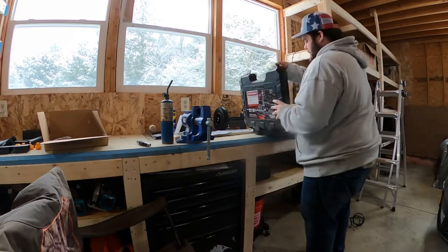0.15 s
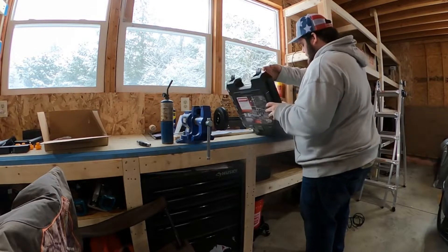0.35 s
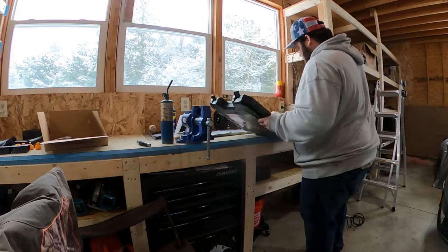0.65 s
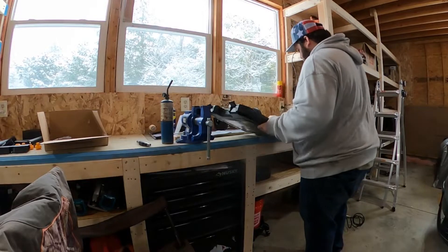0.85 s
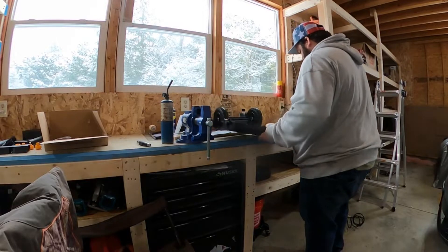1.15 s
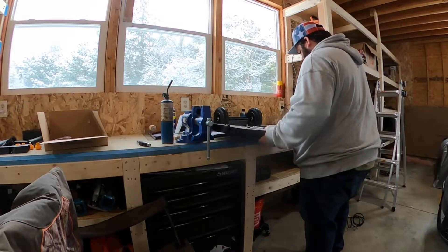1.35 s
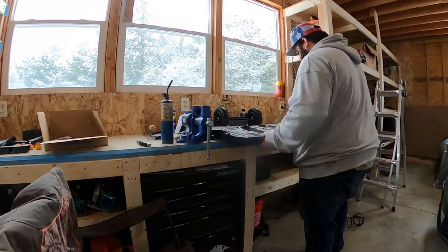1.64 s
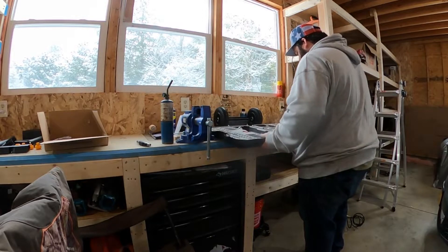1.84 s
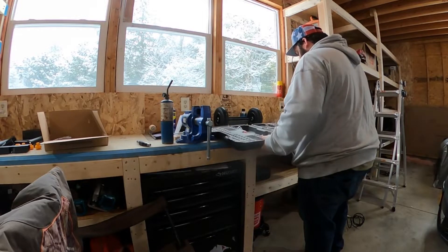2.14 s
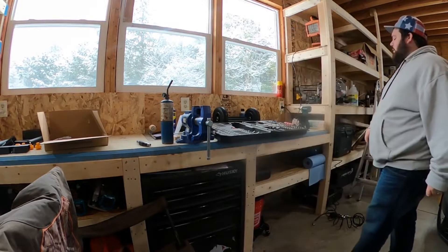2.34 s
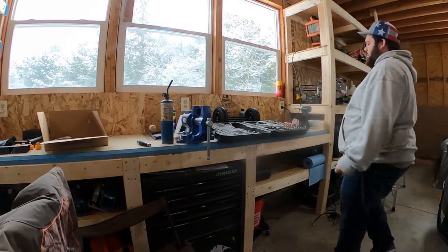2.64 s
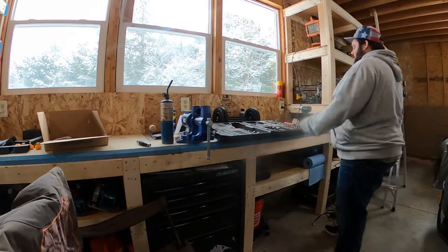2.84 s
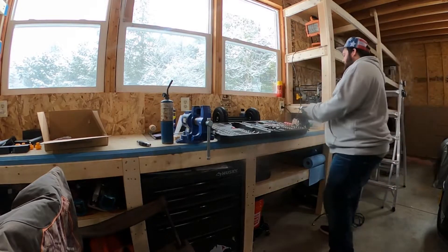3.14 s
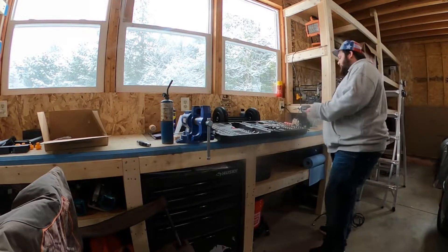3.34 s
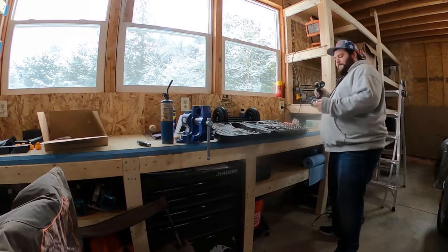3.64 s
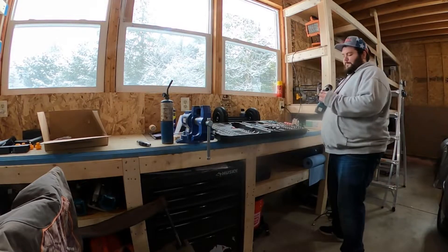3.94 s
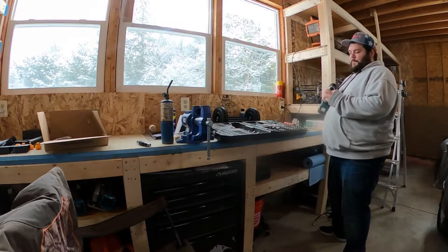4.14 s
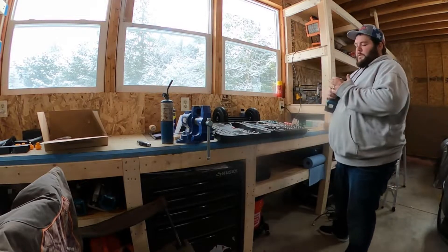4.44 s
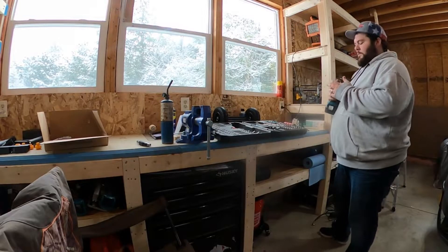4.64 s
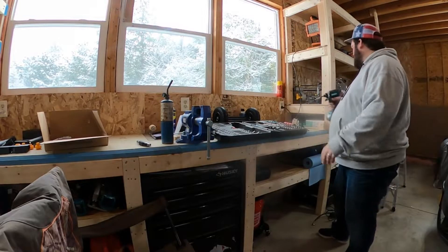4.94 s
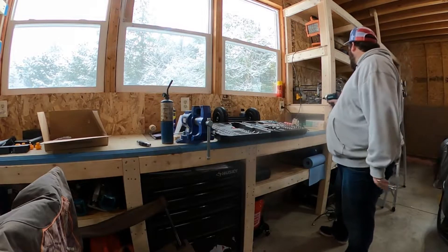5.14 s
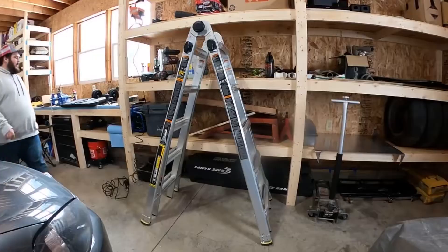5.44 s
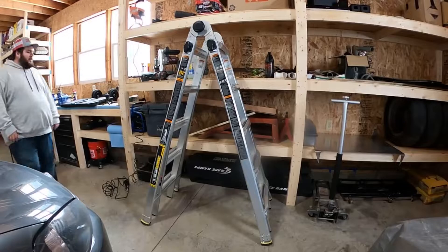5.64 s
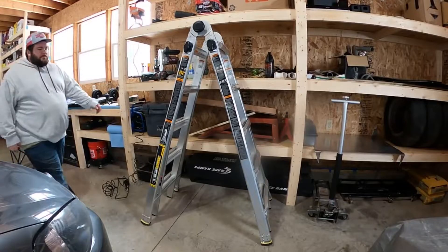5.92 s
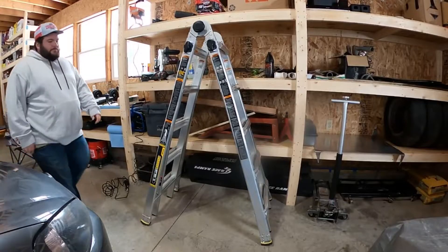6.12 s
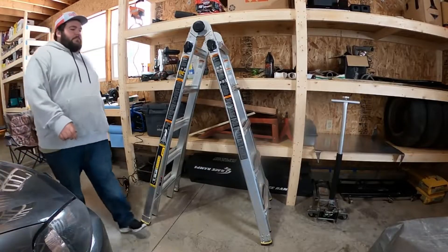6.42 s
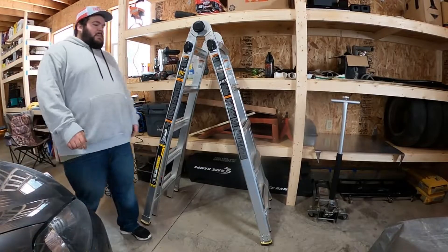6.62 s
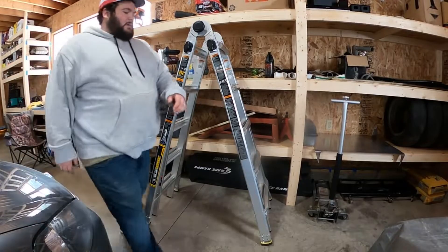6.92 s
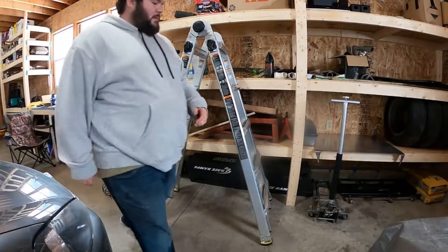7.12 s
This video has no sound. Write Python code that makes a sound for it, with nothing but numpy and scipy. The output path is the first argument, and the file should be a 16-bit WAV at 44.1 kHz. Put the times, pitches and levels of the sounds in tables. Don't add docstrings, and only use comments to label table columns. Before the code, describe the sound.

In a bare, echoing garage, a hard plastic case knocks and clatters open, steel parts chink, one sharp metallic snap rings, then footsteps scuff concrete.

```python
import sys
import numpy as np
from scipy import signal
from scipy.fft import rfft, irfft, next_fast_len
from scipy.io import wavfile
from scipy.ndimage import uniform_filter1d, map_coordinates

SR = 44100
rng = np.random.default_rng(int(sys.argv[2]) if len(sys.argv) > 2 else 0)


def master(y):
    cut = np.clip(np.atleast_2d(y).T, -1, 1)
    pcm = np.round(cut * 32767)
    wavfile.write(sys.argv[1], SR, pcm.astype(np.int16))


def gain_from_decibels(decibels):
    exponent = np.asarray(decibels, float) / 20
    return 10 ** exponent


N = 320646

SCENE_CHANGES = [2.2008, 5.203, 8]


def clicks(mix, rooms):
    # [t/s, peak level/dB, weight/dB, hardness/dB, room/dB]
    shell = [(0.0505, -43, 3.5, -27, 14.5), (0.077, -32, 2.5, -25.5, 9), (0.1885, -30, 8, -28, 6.5),
             (0.2622, -42.5, 8.5, 0, 3), (0.382, -32, 8, -19, -1.5), (0.4173, -47, -6, -10, 16.5),
             (0.5062, -31, 3, -26, -1.5)  , (0.5259, -21, 5, -25.5, 0.5), (0.5567, -26, -2.5, -31.5, -11),
             (0.624, -59, 17.5, -39.5, -11), (0.6716, -42, 1, 0, -7), (0.7171, -45.5, 8, -33.5, -1.5)]
    latches = [(1.1252, -56, -2, -20, 16), (1.1582, -31, -8, -44, -8), (1.3248, -35.5, -1, -7, -4),
               (1.3507, -35.5, -10, -5.5, 1), (1.4428, -26, -16.5, -11, -6.5),
               (1.4692, -20, -15, -23, -4.5), (1.5497, -25, -14, -14, 7.5),
               (1.6955, -30.5, -10.5, 1.5, 1.5), (1.7734, -13, -20.5, -8.5, -6),
               (1.828, -18, -8, -4.5, -0.5), (1.954, -15, -15.5, -26.5, 2),
               (2.1877, -13.5, -19.5, -5.5, -9.5), (2.4318, -50, 9, 20.5, -0.5),
               (2.4908, -39.5, -3.5, -6, 5), (2.6214, -32, -16, -23, -8.5), (2.864, -33.5, -7.5, -4.5, 9.5),
               (2.8776, -29.5, -19, -12, 9), (3.2928, -36.5, -15.5, -2.5, 0.5),
               (3.6083, -39.5, -5.5, -21, -11), (3.8812, -30, -0.5, -24, -5), (3.8962, -23, -11.5, -3, 4.5),
               (4.0145, -35, -6, -4, -3)]
    catch = [
        (4.3927, -44.5, -2.5, -3, 8),
        (4.4166, -27.5, -1, 0.5, -4.5),
        (4.42, -6.5, -8, -8, -2),
    ]
    boots = [(5.1598, -40.5, -10, -17, 11), (5.365, -37, -4.5, -23, 4), (5.3866, -36, -4.5, -29.5, 7.5),
             (5.489, -53, -11.5, -5.5, 18), (5.514, -37.5, -14.5, -8.5, 10), (5.886, -35.5, -1, -50, 6),
             (6.4384, -40.5, 12, -5, -13), (6.4549, -36.5, -4.5, -29, 10.5), (6.4905, -41, 13, -20, -5.5),
             (6.958, -46.5, 7, -5, 8.5), (6.985, -38.5, -2.5, -49, 12)]
    # [f/Hz, level/dB per Hz]
    plastic_colour = [(180, -25.5), (300, -18), (446, -15.5), (674, -8), (781, -7), (907, -8), (985, -7),
                      (1240, -2.5), (1350, -4.5), (1750, -6.5), (3400, -1.5), (5660, -6), (6150, -3),
                      (10600, -23.5), (15500, -50.5)]
    # [f/Hz, level/dB per Hz]
    tool_colour = [(180, -30), (300, -28.5), (360, -17), (517, -19.5), (610, -10.5), (953, -12.5),
                   (1330, -3.5), (1540, -12), (1700, -4), (2150, -1.5), (3230, -7), (3690, 0), (4490, -6),
                   (8840, -4), (9800, -4), (13800, -27.5), (15500, -39.5)]
    # [delay/s, level/dB]
    walls = [(.0045, -2.5), (.0102, -1), (0.0135, -4), (.023, -7), (.031, -24.5)]

    t, hz = np.arange(4096) / SR, np.fft.rfftfreq(1024, 1 / SR)

    def burst(u):
        return gain_from_decibels(-60 * u / .016) * (1 - np.exp(-u / .0006))

    echoes = np.sqrt(sum((gain_from_decibels(db) * burst(np.maximum(t - s, 0))) ** 2 for s, db in walls))
    for s, db, body_db, edge_db, room_db in shell + latches + catch + boots:
        bite_db = 0.5 + 0.66 * edge_db
        struck = along(tool_colour if 4.3 < s < 4.8 else plastic_colour, hz)
        tilt = [(400, body_db + 14.0), (1200, body_db + 6), (2100, 0.025),
                (4200, bite_db), (5400, bite_db), (7200, edge_db + 4.5)]
        ripple_db = 1.7 * unit(uniform_filter1d(rng.standard_normal(len(hz)), size=3))
        colour = causal(gain_from_decibels(struck + along(tilt, hz) + ripple_db))

        rattle = gain_from_decibels(2.5 * np.repeat(rng.standard_normal(64), 64))
        crackle = unit(rng.standard_normal((2, len(t))) * rattle)
        crackle[0, 40] = 4 if s < SCENE_CHANGES[1] else 9
        direct = burst(t) * np.array([[1], [.3]])
        sound = gain_from_decibels(room_db + 17) * rooms[rng.integers(len(rooms))]
        sound[:, :len(t)] += crackle * np.hypot(direct, gain_from_decibels(room_db / 3) * echoes)
        scale = gain_from_decibels(db + 3.0) / np.sqrt(np.mean(gain_from_decibels(2 * struck)))
        add(mix, s - .001, scale * signal.oaconvolve(sound, colour[None], axes=1))


def thuds(mix, rooms):
    # [t/s, peak level/dB, f/Hz, room/dB]
    blows = [(0.089, -23.5, 527, 12.5), (0.1875, -15, 186, -6.5), (0.29, -37, 384, 20.5),
             (0.203, -22, 300, -6), (0.232, -19, 280, -6), (0.266, -21, 520, -6), (0.321, -22, 255, -28),
             (0.378, -18, 198, 1), (0.527, -24, 800, 5.5), (0.559, -18, 580, 0), (1.002, -45, 153, -16),
             (1.121, -39, 144.5, 11.5), (1.155, -27, 511, 6.5), (1.833, -34.5, 252, 10),
             (1.888, -9, 294, 1.5), (1.93, -24, 327, 2), (1.958, -21, 170, 2), (2.441, -30, 169, 5),
             (2.486, -30, 178, -17), (2.599, -24, 480, 3), (2.639, -31, 434, -0.5), (2.861, -27.5, 240, 5),
             (3.8815, -30, 459, 9.5), (4.417, -27, 600, -4)]
    heels = [(5.158, -38.5, 206, 12), (5.366, -22.5, 241, 2.5), (5.409, -28.5, 460, 7),
             (5.887, -24, 385, -1), (5.938, -29, 175, 5.5), (6.379, -48, 172, -4), (6.437, -27, 260, 8.5),
             (6.685, -36, 420, 0), (6.959, -23, 215, 8), (7.227, -33, 411, 0)]

    t = np.arange(SR // 4) / SR
    ratios, levels_db = (.62, 1, 1.7, 2.6), (-2.5, 5.5, -5.5, -9)
    for s, db, hz, room_db in blows + heels:
        t60 = 0.015 + 7.8 / hz
        phases = rng.uniform(0, 0.32, size=4)
        ring = sum(gain_from_decibels(level) * np.sin(2 * np.pi * (hz * k * t + p))
                   for k, level, p in zip(ratios, levels_db, phases))
        blow = gain_from_decibels(db - 8.5 - 60 * t / t60) * ring * (1 - np.exp(-t / 0.00043))
        add(mix, s - .0015, roomy(rooms, blow, room_db - 4.0))


def steel(mix, rooms):
    # [t/s, level/dB]
    rolls = [
        (.408, -49),
    ]
    # [f/Hz, level/dB, t60/s]
    socket_modes = [(7530, 9.5, 0.11), (9700, -11.5, 0.31), (14340, -31, .4)]
    # [f/Hz, level/dB, t60/s]
    snapped = [(1728, -5, 0.85), (2137, 0, 0.39), (2546, -9, 1.1), (3058, -2, 0.15), (3655, -7, 0.4),
               (4856, -17, 1.1), (5696, -16, 2.6), (6105, 0, 0.15), (6304, -18, 5.0), (7111, -11, 0.71),
               (7811, -13, 0.5), (8403, -8, 0.37), (8882, -1, 0.23), (9663, -7, 0.29)]
    lifted = [(1873, -17, 0.67), (2584, -12, 0.59), (3214, -25, 5.0), (4474, -11, 0.78), (5152, 0, 0.2),
              (5663, -16, 2.3), (6008, 0, 0.098), (6821, -2, 0.14)]
    # [t/s, peak
    # level/dB, f/Hz, t60/s, room/dB]
    short_notes = [(0.524, -9, 765, 0.0082, 5), (0.716, -31.5, 1950, 0.014, -6), (1.443, -17.5, 1420, 0.01, -9),
                   (1.469, -30, 2210, 0.021, -14), (1.55, -17, 3900, 0.012, -8), (1.772, -17, 6100, 0.0086, 1),
                   (1.828, -3, 3480, 0.0049, 0.5), (1.953, -10.5, 1940, 0.012, -19),
                   (2.185, -8.5, 1850, 0.0061, 3.5), (2.386, -36.5, 3000, 0.0059, 5),
                   (2.43, -15.5, 6960, 0.0072, -12), (2.874, -23, 2440, 0.014, -14.5),
                   (3.292, -27, 3120, 0.0062, 4), (3.8803, -11, 1100, 0.004, -12),
                   (3.8955, -13, 5180, .012, -16), (4.0145, -24, 2110, 0.0061, -17),
                   (5.028, -41, 2570, 0.0057, 4), (5.16, -34, 2410, 0.016, 3.5),
                   (6.668, -43, 11600, 0.0059, -7), (6.724, -36, 4110, .01, -8), (6.491, -15, 870, 0.006, -14),
            (6.9585, -27, 920, .006, 3), (6.455, -30, 2700, .004, -10),
                   (.075, -19, 900, .02, -8), (.2625, -34, 5600, .008, -8), (.526, -28, 3300, .012, -4),
               (.53, -20, 1300, .015, -6), (1.3515, -32, 4800, .006, -6), (1.469, -21, 3900, .01, -6),
               (1.476, -27, 2600, .012, -4), (1.5505, -25, 6100, .008, -6), (1.559, -28, 7100, .008, -8),
               (1.556, -29, 2700, .012, -4), (1.6955, -25, 4900, .008, -4), (1.698, -27, 6200, .01, -4),
               (1.7735, -15, 3900, .008, -6), (1.783, -19, 3000, .012, -6), (1.829, -19, 6200, .008, -4),
               (2.105, -36, 3050, .03, -2), (2.187, -20, 4900, .008, -6), (2.5, -36, 1400, .015, -6),
               (3.9, -22, 2300, .008, -8), (3.905, -20, 4700, .012, -4), (5.887, -22, 830, .008, -6),
               (6.437, -28, 1260, .006, -6), (6.439, -31, 5900, .004, -10), (6.668, -40, 7800, .004, -8),
               (3.979, -30, 2500, .004, -12), (4.0145, -28, 6200, .004, -12), (6.985, -23, 1280, .008, -6),
               (7.039, -32, 800, .01, -6)]

    t = np.arange(SR // 2) / SR

    def roll():
        waver_db = 5.5 * map_coordinates(rng.standard_normal(60), [t * 100])
        return gain_from_decibels(waver_db) * (1 - np.exp(-t / .003))

    for s, db in rolls:
        ring = sum(roll() * gain_from_decibels(db + level - 60 * t / t60) * np.sin(2 * np.pi * hz * t)
                   for hz, level, t60 in socket_modes)
        add(mix, s, roomy(rooms, ring, room_db=-5))

    hand_t60 = .18
    for s, db, modes in [(4.42, -34, snapped), (3.896, -42, lifted)]:
        ring = sum(gain_from_decibels(db + level - 60 * t / min(t60, hand_t60)) * np.sin(2 * np.pi * hz * t)
                   for hz, level, t60 in modes)
        add(mix, s, roomy(rooms, ring * (1 - np.exp(-t / .001)), room_db=0))

    t = t[:4096]
    echo_delay, echo_db = 455, -5
    for s, db, hz, t60, room_db in short_notes:
        note = gain_from_decibels(db + 0.5 - 60 * t / t60) * np.sin(2 * np.pi * hz * t) * (1 - np.exp(-t / 0.00062))
        if s < SCENE_CHANGES[1]:
            note[echo_delay:] += gain_from_decibels(echo_db) * note[:-echo_delay].copy()
        add(mix, s, roomy(rooms, note, room_db))


def skid():
    # [t/s, level/dB]
    scuff = [(5.6, -59), (5.646, -59), (5.724, -40.5), (5.832, -46), (5.892, -57), (5.92, -52)]
    # [f/Hz, width/Hz, level/dB]
    sole = [(3000, 310, -8.5), (4380, 440, 4.5), (6010, 370, -10.5)]

    noise = gritty([(1500, -27.5), (2500, 8.5), (9000, -17.0), (12000, -35)], rate=200, depth_db=1.5)
    noise = filtered(noise, lambda f: sum(gain_from_decibels(db) * f * w / np.hypot(c * c - f * f, f * w)
                                          for c, w, db in sole))
    return gain_from_decibels(curves(scuff)[0]) * noise / np.std(noise[0])


def creak():
    # [t/s, f/Hz, level/dB]
    settling = [(3.29, 139.4, -73), (3.314, 136, -50.5), (3.36, 123.1, -64), (3.44, 148, -61),
                (3.46, 155.1, -83)]

    hz, db = curves(settling)
    return gain_from_decibels(db + 6.5) * np.sin(2 * np.pi * np.cumsum(hz) / SR) * np.array([[1], [.3]])


def rubbing():
    # [peak t/s, level/dB, length/s]
    shoves = [(0.02, -44, 0.12), (0.25, -30.5, 0.17), (0.45, -38, 0.27), (0.6, -42.5, 0.22),
              (1.51, -53.5, 0.37), (1.95, -46.5, 0.44), (2.15, -45, 0.55), (2.6, -47, 0.22),
              (4.45, -49.5, 0.13), (5.42, -39.5, 0.14), (5.74, -45.5, 0.45), (5.91, -37.5, 0.15),
              (6.1, -51.5, 0.33), (6.61, -44.5, .3), (7.13, -51.5, 0.77)]
    # [peak t/s, level/dB, length/s, fineness/dB]
    slides = [(0.01, -39, 0.38, -13), (0.228, -39, 0.44, -4), (0.54, -42, 0.16, -6),
              (0.91, -57.5, 0.57, -4), (1.462, -42.5, 0.28, -6.5), (1.903, -32.5, 0.23, -19),
              (2.15, -41.5, 0.59, -10), (2.574, -47.5, 0.32, 0), (2.915, -52, 0.11, -16),
              (3.56, -59, 2.95, 4), (4.028, -46.5, 0.19, -17), (4.329, -61.5, 0.22, 4.5),
              (4.642, -47, .25, 4.5), (5.532, -50, 0.51, -4.5), (5.77, -47, 0.51, 1.5),
              (6.136, -56, 0.37, -3), (6.59, -52, 0.5, 2), (7.085, -54, 1.26, 0)]
    # [t/s, level/dB]
    shakes = [(0.339, -56), (1.17, -59), (1.62, -56), (1.8, -55), (2.0, -55), (2.15, -54), (2.32, -62),
              (2.91, -51.5), (3.36, -60), (5.399, -59), (5.91, -63), (6.48, -58), (6.94, -55), (7.26, -59)]
    # [t/s, level/dB]
    drag = [(2.205, -87), (2.217, -53), (2.319, -55), (2.383, -60), (2.42, -75)]
    # [f/Hz, level/dB per Hz]
    rumble = [(59, -65), (100, -20), (189, 0.5), (235, -5.5), (275, -3), (301, -4), (482, -4), (900, -16.5),
              (1170, -50), (1980, -120)]
    rasp = [(350, -72), (600, -13), (807, -7.5), (875, -10), (1080, 0), (1280, 1.5), (1670, -1),
            (3000, -12.5), (3900, -24.5), (6600, -120)]
    hiss = [(1290, -16), (2200, -3), (3260, -3), (3740, -4.5), (4320, -2.5), (5410, -5.5), (6100, -3),
            (8350, -13), (10200, -19), (14000, -38), (15000, -53)]
    # [rumble/dB, rasp/dB, hiss/dB, shake/dB]
    rumble_db, rasp_db, hiss_db, shake_db = (-66, -71.5, -74, -76)
    lid_colour = [(1000, -40), (1250, 0), (1370, 0), (1600, -17), (2900, -20), (3250, -10), (3700, -21),
                  (4300, -10), (4800, -22), (8000, -40)]
    shake_colour = [(12, -20), (30, 0), (60, -7), (100, -10), (140, -60)]

    low = strokes(shoves, rumble_db) * gritty(rumble, rate=40, depth_db=2)
    mid = strokes([row[:3] for row in slides], rasp_db) * gritty(rasp, rate=140, depth_db=1)
    fine = [(s, db + fine_db, length) for s, db, length, fine_db in slides]
    high = strokes(fine, hiss_db) * gritty(hiss, rate=230, depth_db=.7)
    lid = gain_from_decibels(curves(drag)[0]) * gritty(lid_colour, rate=60, depth_db=1)
    swells = [(s, db, 0.2) for s, db in shakes]
    shake = strokes(swells, shake_db) * gritty(shake_colour, rate=12, depth_db=2.5)
    return low + mid + high + lid + shake


def garage(count):
    # [f/Hz, t60/s]
    decay = [(100, 0.16), (300, 1), (800, 0.86), (1200, 0.75), (5000, 0.62), (8000, 0.43), (13000, 0.36)]
    # [f/Hz, fall/dB per s squared]
    late_fall = [(150, 301.5), (800, 397.5), (1200, 45), (6000, 67.5), (12000, 149.5)]

    hz, t = np.fft.rfftfreq(256, 1 / SR)[:, None], np.arange(160) * 128 / SR
    re, im = rng.standard_normal((2, count, 2, 129, 160), dtype=np.float32)
    fall_db = 60 * t / along(decay, hz) + t ** 2 * np.abs(along(late_fall, hz))
    tail = signal.istft((re + 1j * im) * gain_from_decibels(-fall_db), SR, nperseg=256)[1]
    tail *= 1 - np.exp(-np.arange(tail.shape[-1]) / (0.0012 * SR))
    return tail / np.linalg.norm(tail[:, :1], axis=2, keepdims=True)


def roomy(rooms, blow, room_db):
    tail = rooms[rng.integers(len(rooms))][:, :15000]
    sound = gain_from_decibels(room_db) * signal.fftconvolve(blow[None], tail, axes=1)
    sound[:, :len(blow)] += blow * np.array([[1], [.4]])
    return sound


def add(mix, s, sound):
    start = round(s * SR)
    stop = min(c for c in SCENE_CHANGES if c > s) * SR - start
    fade = np.clip((stop - np.arange(sound.shape[1])) / (.0015 * SR), 0, 1)
    mix[:, start:start + sound.shape[1]] += (sound * fade)[:, :N - start]


def strokes(rows, quiet_db):
    t = np.arange(0, N + 64, 64) / SR
    s, db, length = (c[:, None] for c in np.transpose(rows))
    fall_db = 27 * np.abs(t - s) / length
    same_scene = np.searchsorted(SCENE_CHANGES, s) == np.searchsorted(SCENE_CHANGES, t)
    power = gain_from_decibels(2 * quiet_db) + (same_scene * gain_from_decibels(2 * (db - fall_db))).sum(axis=0)
    return np.interp(np.arange(N) / SR, t, np.sqrt(power))


def gritty(spectrum, rate, depth_db):
    knots = rng.standard_normal(4000)
    grain = map_coordinates(knots, [np.arange(N) * rate / SR], order=1)
    noise = gain_from_decibels(depth_db * grain) * rng.standard_normal((2, N))
    x = filtered(noise, lambda hz: gain_from_decibels(along(spectrum, hz)))
    return x / np.std(x[0])


def unit(x):
    return x / np.sqrt(np.mean(x ** 2) + 1e-20)


def along(points, hz):
    f, v = np.transpose(points)
    return np.interp(np.log(hz + 1), np.log(f + 1), v)


def curves(rows):
    s, *cols = np.transpose(rows)
    return [np.interp(np.arange(N) / SR, s, c, -120, -120) for c in cols]


def filtered(x, response):
    m = next_fast_len(x.shape[-1] + 4096)
    return irfft(rfft(x, m) * response(np.fft.rfftfreq(m, 1 / SR)), m)[..., :x.shape[-1]]


def causal(gain):
    c = irfft(np.log(gain + 1e-5))
    c[1:len(c) // 2] *= 2
    c[len(c) // 2 + 1:] = 0
    return irfft(np.exp(rfft(c)))


def scene():
    # [f/Hz, side over mid/dB]
    width = [(30, -15), (60, -11), (200, -19), (850, -27), (1100, -6.5), (4000, -6), (9000, -1), (13000, 4)]
    lean = [0.01, -0.07, 0.099]

    hits = np.zeros((2, N))
    rooms = garage(count=24)
    clicks(hits, rooms)
    thuds(hits, rooms)
    steel(hits, rooms)
    hits = signal.sosfilt(signal.butter(6, 148, "high", fs=SR, output="sos"), hits)
    mid, side = hits * gain_from_decibels([[0], [-8]]) + skid() + creak() + rubbing()
    place = np.array(lean)[np.searchsorted(SCENE_CHANGES, np.arange(N) / SR)]
    side = filtered(side, lambda hz: gain_from_decibels(along(width, hz)))
    side = side + place * filtered(mid, lambda hz: hz > 1000)
    return np.array([mid + side, mid - side])


def top_cut(x):
    return signal.sosfilt(signal.butter(12, 15700, fs=SR, output="sos"), x)


def record(dry):
    mix = filtered(dry, lambda hz: hz < 15700)
    return top_cut(mix)


dry = scene()
out = record(dry)
master(out)
```